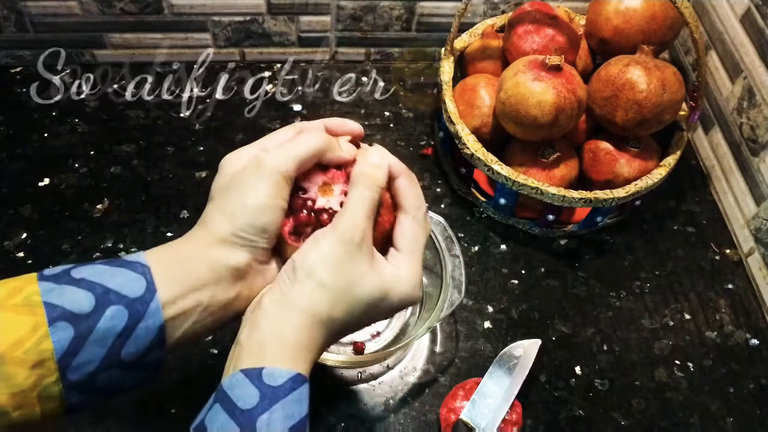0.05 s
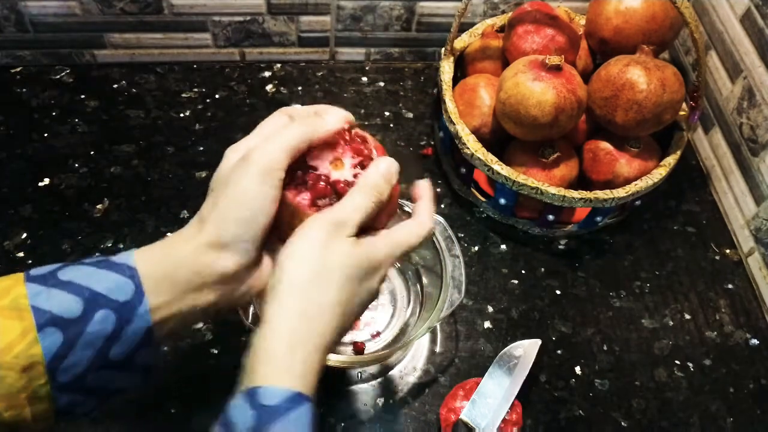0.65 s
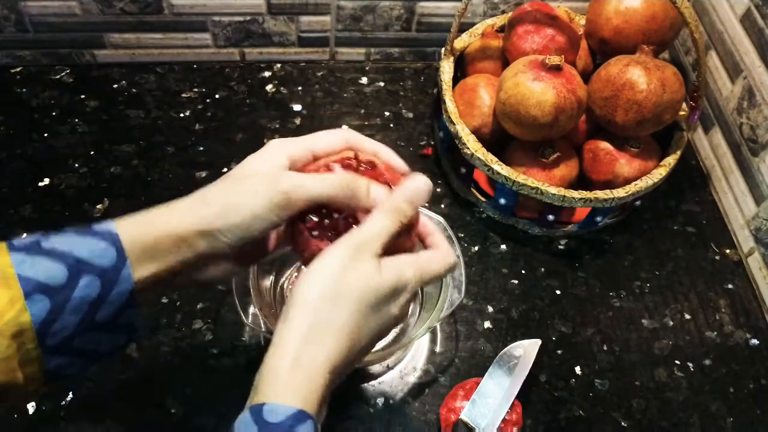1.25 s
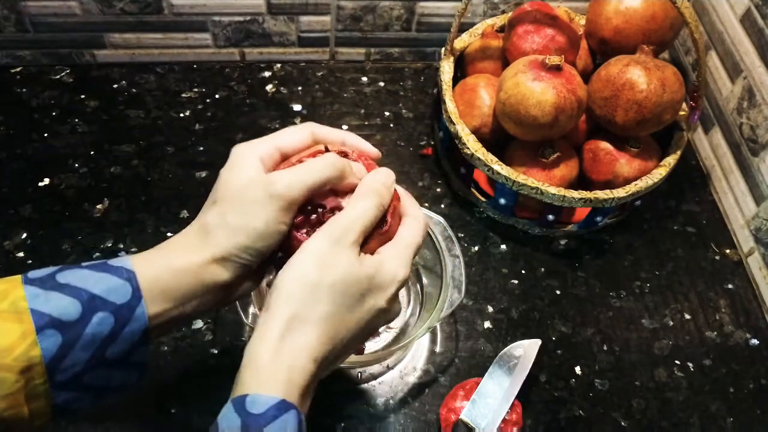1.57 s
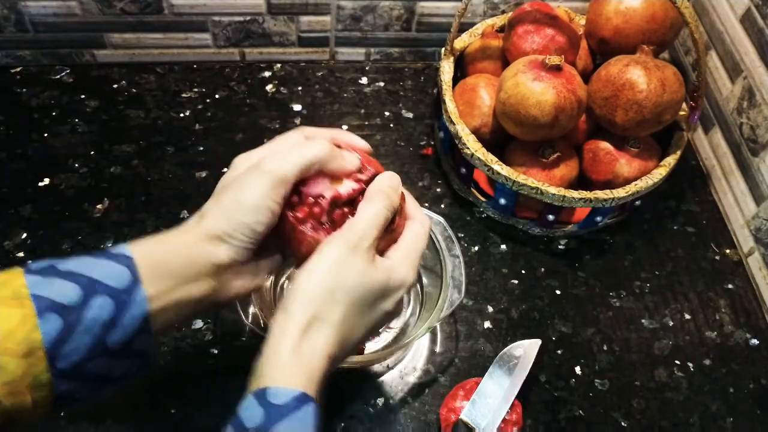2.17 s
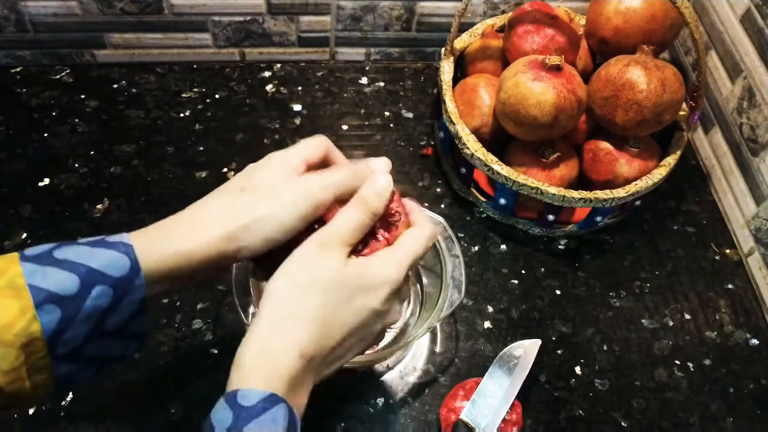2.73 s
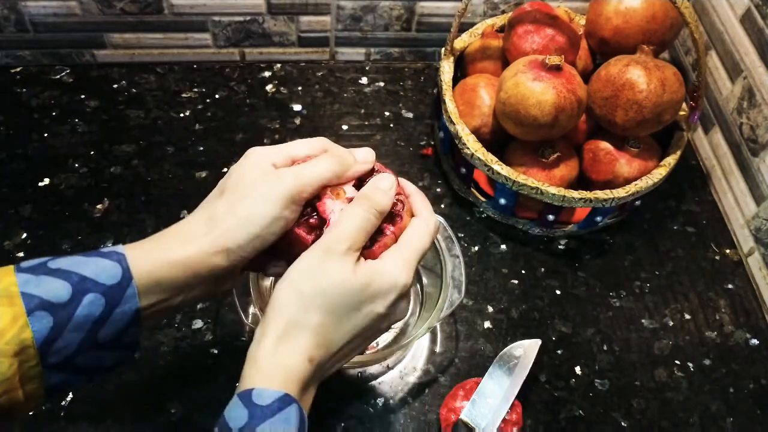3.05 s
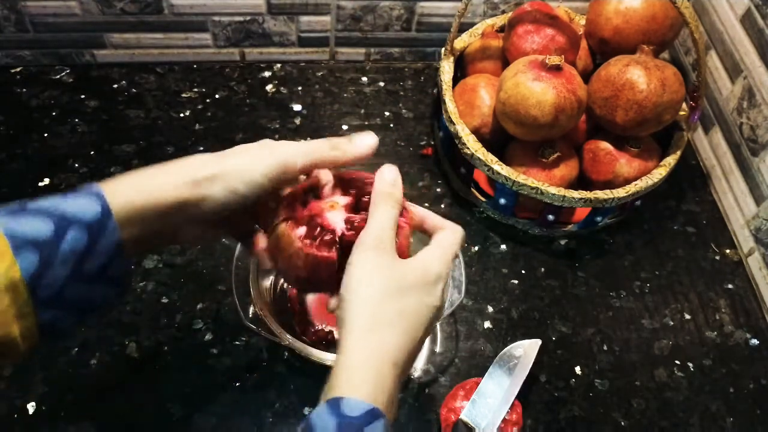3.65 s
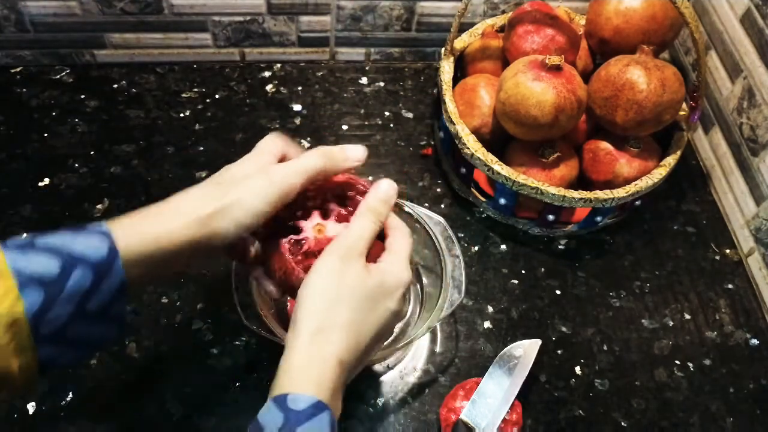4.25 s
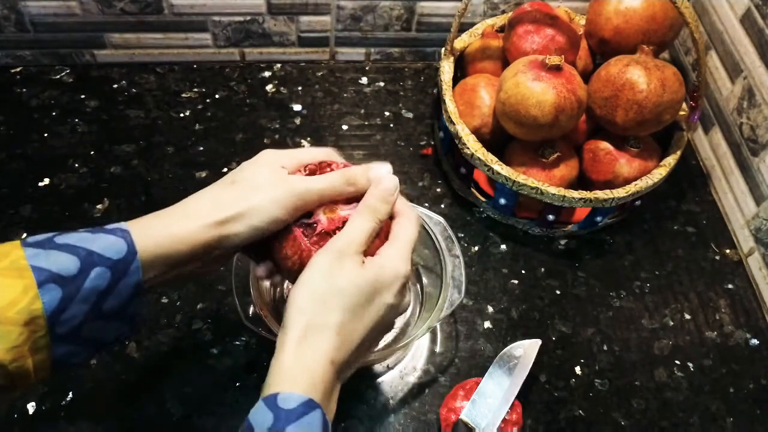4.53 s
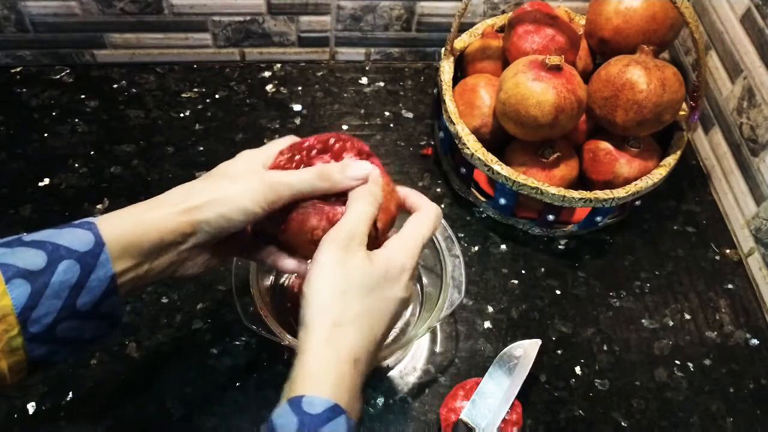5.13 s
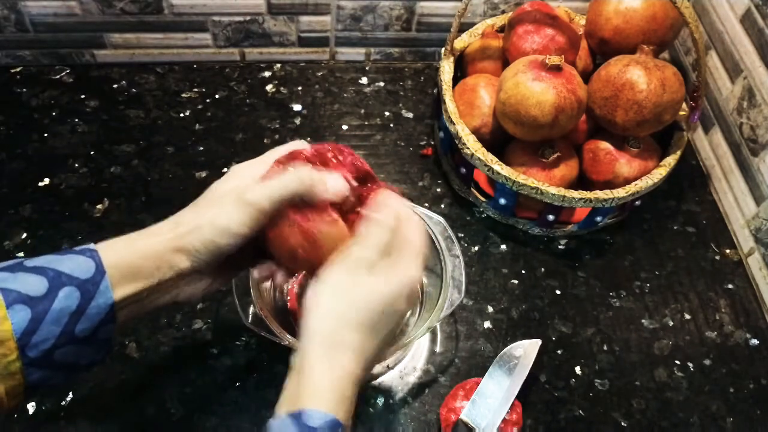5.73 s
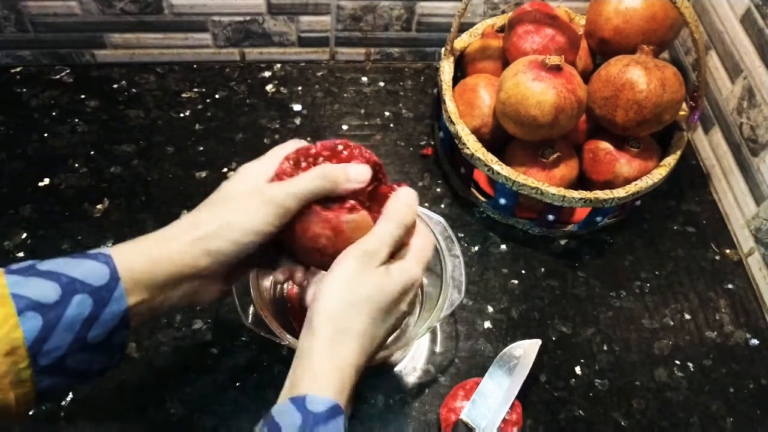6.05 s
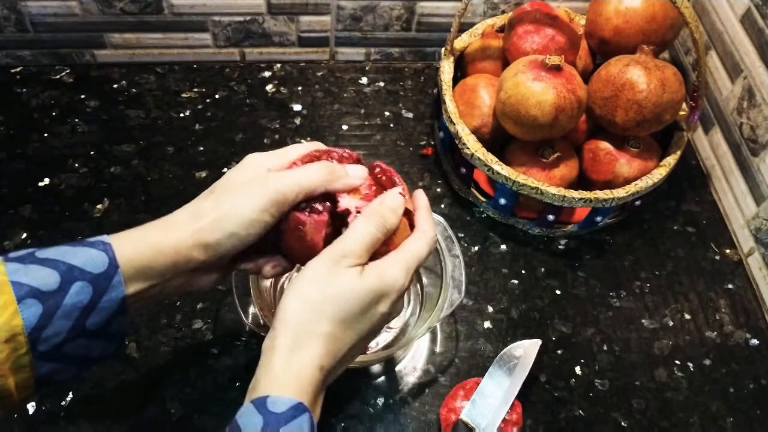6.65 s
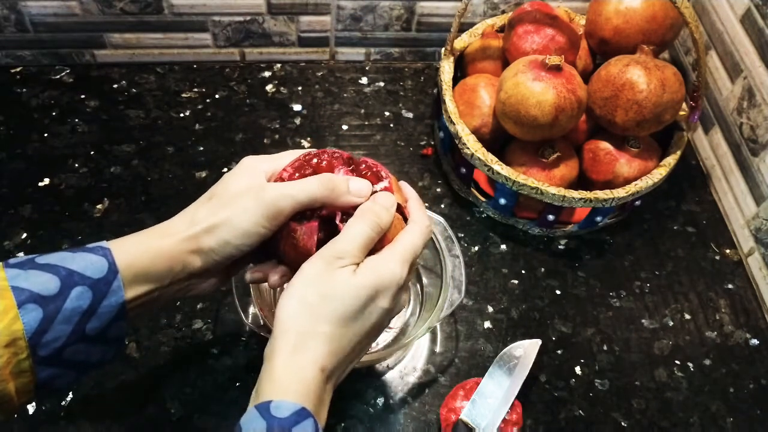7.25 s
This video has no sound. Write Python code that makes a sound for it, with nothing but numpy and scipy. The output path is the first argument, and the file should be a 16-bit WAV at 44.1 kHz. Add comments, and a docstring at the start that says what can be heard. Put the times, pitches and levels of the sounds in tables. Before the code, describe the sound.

A low appliance hum fills a tiled kitchen while a pomegranate is broken open by hand, heard from nearby. The rind gives way in three brief, crisp, slightly hollow bursts of cracking, each with a short room echo. The quieter stretches before and between them hold the soft, sticky crackle of wet pith and an occasional faint tap of a seed landing in a glass bowl.

```python
"""In a tiled kitchen, two hands break a pomegranate open over a glass bowl on a stone counter.
The rind gives way in three loud bouts of snaps: fibres break and the freed pieces ring briefly.
Wet pith crackles as it tears in between, and a few seeds tick against the glass.
Counter and walls throw the sound back, while an appliance hums low in the room."""
import sys
import numpy as np
from scipy import signal
from scipy.fft import rfft, irfft, next_fast_len
from scipy.io import wavfile

SR = 44100
rng = np.random.default_rng(int(sys.argv[2]) if len(sys.argv) > 2 else 0)


def generate_wav(sig):
    """Save sig (samples, or channels by samples) to the path in sys.argv[1] as 16-bit PCM at SR."""
    pcm = np.round(np.clip(np.atleast_2d(sig).T, -1, 1) * 32767).astype(np.int16)
    wavfile.write(sys.argv[1], SR, pcm)


N = 330309
TIME = np.arange(N) / SR
FULL_SNAP_DB = -27.5  # a snap at this level counts as full strength
STEREO_ABOVE_HZ = 4600  # left and right differ only in the treble

# The tone of the room's steady air noise. Each row: frequency in Hz, level in dB.
AIR_TONE = [(25, -23.5), (58, -43), (92, 4.5), (190, 3), (330, 1), (430, -7), (1000, -4.5), (1700, -12.5),
            (2400, -14.5), (3500, -27), (4200, -34.5), (6800, -39), (8200, -57.5), (13000, -39)]
# The drones of the appliance and the room. Each row: pitch in Hz, width in Hz, level in dB.
DRONES = [(110.2, 1.6, -57.5), (109.3, 36, -59.5), (134.7, 20, -62), (211.9, 4.2, -67), (248.3, 4.1, -95.5),
          (301.8, 12.5, -64.5), (341.6, 28.1, -70), (407, 11, -77), (903, 21, -78.5), (1022.4, 14, -74.5),
          (2268, 160, -74), (3028, 64, -83.5), (3685, 150, -87), (7820, 850, -93)]
# How the hum slowly sinks. Each row: time in seconds, gain in dB.
HUM_GAIN = [(0, 4.5), (.5, 2), (4.5, -1.4), (7.4, -1.5)]
# A faint drone that climbs midway. Each row: time in seconds, pitch in Hz, level in dB.
CLIMB_PATH = [(0, 324, -82), (2.8, 301.8, -77), (3.603, 302, -61.5), (4.299, 337, -57.5), (5, 337.5, -61),
              (6.001, 340.3, -76), (7.5, 336, -99)]
# Echoes from the counter and tiles. Each row: delay in seconds, level in dB.
NEAR_ECHOES = [(.0011, -18.5), (.0036, -7.5), (.0068, -13.5), (0.023, -12.5)]
# How long the kitchen rings on. Each row: frequency in Hz, seconds to fade by 60 dB.
ROOM_FADE = [(300, 0.51), (2500, 0.25), (6000, 0.28), (12000, 0.23)]
# The bowl's notes, damped by the fruit in it. Each row: pitch in Hz, level in dB, seconds to fade 60 dB.
BOWL_NOTES = [(1720, -17, 0.015), (2050, -2, 0.028), (2530, -7, 0.012), (2980, -10, 0.039),
              (3550, -22, 0.0096), (7950, 12, 0.028)]
# Seeds landing in the bowl. Each row: start in seconds, level in dB, pitch of the tap in Hz.
SEED_TAPS = [(0.1873, -44, 1790), (1.343, -48.5, 2190), (3.4075, -43.5, 3200), (4.24, -52, 2900),
             (5.023, -44, 2670)]
# Pulls that tear the pith. Each row: middle in seconds, level in dB, half length in seconds.
PULLS = [(.068, -55.5, 0.033), (.35, -71, 0.092), (.57, -74.5, .06), (.857, -68.5, .05),
         (1.215, -67.5, 0.0062), (1.347, -71, 0.021), (1.905, -71, .01), (2.045, -65, 0.042),
         (2.163, -53, .005), (3.195, -71, 0.014), (3.368, -72, 0.015), (3.657, -34, .0098),
         (5.13, -67.5, 0.04), (5.956, -53, 0.0091), (6.557, -74, 0.013), (7.08, -67, 0.019)]
# The tone of wet pith. Each row: frequency in Hz, level in dB.
PITH_TONE = [(300, -7), (1000, -6.5), (2800, 4), (4000, -6), (4900, -3.5), (6800, -5.5), (8400, 2),
             (10500, -7.5), (13000, -7.5)]
# Slow rips in the rind. Each row: middle in seconds, level in dB, half length in seconds.
RIND_RIPS = [(2.333, -36, .0065), (3.588, -44, 0.0047), (3.632, -41, 0.03), (3.668, -44, 0.0038),
             (5.957, -55.5, 0.016)]
# The tone of cracking rind. Each row: frequency in Hz, level in dB.
RIND_TONE = [(40, -13), (130, -20), (300, 1.5), (550, -2), (900, 2.5), (1400, 6.5), (1900, 5.5),
             (3100, 0.5), (3700, -1), (5100, 2), (6800, 3), (8600, 1.5), (10300, -3.5), (13000, -4.5)]
# The notes of the split fruit in cupped hands. Each row: pitch in Hz, width in Hz, level in dB.
HOLLOW_NOTES = [(1760, 18, -9), (1848, 42, 5.5), (2178, 52, 2), (2446, 49, 6), (2660, 100, -8),
                (2730, 160, -6.5), (3020, 235, 6), (3090, 90, -13), (4610, 97, 4.5), (5130, 120, 1.5),
                (8250, 490, -2)]
# Snaps of the rind. Each row: start in seconds, level in dB, pitch of the freed piece in Hz,
# thump gain in dB, treble gain in dB, level change per jump of the crack in dB.
RIND_SNAPS = [(0.075, -49.5, 4500, 5, 1.5, -7), (0.097, -54.5, 4500, 8, 2, -14),
              (.2552, -49, 3060, 3, -2, -12), (.2836, -54.5, 2020, -4, -2, -12),
              (.342, -54.5, 2950, -5, -11, -12), (.379, -54, 2200, -10, -10, -8),
              (0.546, -56.5, 2100, -12, -12, -10), (2.178, -48.5, 3000, -1, -3, -3),
              (2.19, -23.5, 2670, -10, -11, -3), (2.237, -24.5, 2700, -18, -6.5, -13),
              (2.273, -21, 2520, -6.5, -10, -10.5), (2.2902, -30.5, 3050, -23, -12, -4.5),
              (2.3148, -20.5, 2400, -9, -7, -11.5), (2.3415, -34, 2460, -19, 1.5, -13),
              (2.382, -35, 2060, -16, -4.5, -12), (3.451, -51.5, 1780, 7, -8, -11),
              (3.4948, -46, 1830, -6, -0.5, -18), (3.59, -33, 2840, -6.5, -8.5, -1.5),
              (3.614, -32, 1910, -0.5, -9.5, -2.5), (3.6252, -27.5, 1820, -3.5, -14, -7),
              (3.637, -36, 1800, 0, -3, -8), (3.6824, -27.5, 2480, -13, -16, -9.5),
              (5.1305, -45.5, 2270, -11, -3.5, -18), (5.8914, -43, 3240, -19, -1.5, -13),
              (5.954, -42.5, 2500, -11, 2.5, -21), (5.963, -38.5, 3600, -3.5, -11, -19),
              (6.1681, -21, 3650, -13.5, -10, -3), (6.176, -24.5, 2450, -12.5, -10, -5),
              (7.115, -44.5, 3400, -17, -6, -19)]


def undb(db):
    """Turn decibels into a gain to multiply by."""
    return 10 ** (np.asarray(db) / 20)


def unit(x):
    """Scale to an average (rms) level of 1."""
    return x / np.sqrt(np.mean(x ** 2))


def energy_one(x):
    """Scale to a total energy of 1."""
    return x / np.linalg.norm(x)


def on_log_axis(points, hz):
    """Read between rows of (Hz, value) at the given frequencies."""
    row_hz, value = np.transpose(points)
    return np.interp(np.log(np.maximum(hz, 1)), np.log(row_hz), value)


def colour(x, points, size=8192):
    """Give a sound the tone drawn by rows of (Hz, dB)."""
    gains = undb(on_log_axis(points, np.fft.rfftfreq(size, 1 / SR)))
    cepstrum = irfft(np.log(gains))
    # folding onto the first half keeps the filter from ringing before a click
    cepstrum[1:size // 2] *= 2
    cepstrum[size // 2 + 1:] = 0
    response = irfft(np.exp(rfft(cepstrum)))
    return signal.fftconvolve(x, energy_one(response))[:len(x)]


def resonate(x, hz, width):
    """Let a sound ring in a band around one pitch."""
    return signal.lfilter(*signal.iirpeak(hz, hz / width, fs=SR), x)


def cut(x, hz, kind, order=2):
    """Keep only the "low" or the "high" side of a frequency."""
    return signal.sosfilt(signal.butter(order, hz, kind, fs=SR, output="sos"), x)


def add(track, s, sound):
    """Mix a short sound in at s seconds."""
    start = max(int(s * SR), 0)
    track[start:start + len(sound)] += sound[:N - start]


def swells(table):
    """A loudness curve with a bell shape for each row of (middle, level, half length)."""
    out = np.zeros(N)
    for s, db, half in table:
        near = slice(*np.searchsorted(TIME, [s - 4 * half, s + 4 * half]))
        out[near] += undb(db) * np.exp(-((TIME[near] - s) / half) ** 2)
    return out


def after_snaps(release_s):
    """A curve that jumps at each snap, by 1 for a full-strength one, and dies away."""
    kicks = np.zeros(N)
    for s, db, *_ in RIND_SNAPS:
        add(kicks, s, undb([db - FULL_SNAP_DB]))
    return signal.lfilter([1], [1, -np.exp(-1 / (release_s * SR))], kicks)


def drones():
    """Noise gathered in narrow bands, so that each drone wavers by itself."""
    size = next_fast_len(N)
    hz = np.fft.rfftfreq(size, 1 / SR)
    power = 0
    for centre, width, db in DRONES:
        band = unit(1 / (1 + (1.8 * (hz - centre) / width) ** 2))
        power += (undb(db) * band) ** 2
    return irfft(rfft(rng.standard_normal(size)) * np.sqrt(power), size)[:N]


def climbing_drone():
    """A faint, wavering tone that climbs while it is loudest."""
    s, hz, db = np.transpose(CLIMB_PATH)
    waver = unit(1.33 + unit(cut(rng.standard_normal(N), 13, "low")))
    phase = 2 * np.pi * np.cumsum(np.interp(TIME, s, hz)) / SR
    return undb(np.interp(TIME, s, db)) * waver * np.sin(phase)


def appliance(swell_db=-10):
    """Over a soft rush of air, the hum sinks slowly and swells briefly after strong snaps."""
    air = undb(-58.5) * unit(colour(rng.standard_normal(N), AIR_TONE))
    sinking = undb(np.interp(TIME, *np.transpose(HUM_GAIN)))
    swelling = 1 + undb(swell_db) * after_snaps(release_s=0.087)
    hum = cut(drones(), 81.5, "high", order=4) * sinking * swelling
    climb = climbing_drone()
    hiss = undb(-84.5) * cut(rng.standard_normal(N), STEREO_ABOVE_HZ, "high", order=8)
    return air + hum + climb + np.array([hiss, -hiss])


def room_tail(rise_s=0.0034):
    """Countless echoes blur into a tail of noise whose treble dies first."""
    hz, t, spectrum = signal.stft(rng.standard_normal(SR // 2), SR, nperseg=256)
    fade = undb(-60 * t / on_log_axis(ROOM_FADE, hz)[:, None])
    tail = signal.istft(spectrum * fade, SR)[1]
    rise = 1 - np.exp(-TIME[:len(tail)] / rise_s)
    return energy_one(tail * rise)


def late_echoes(direct, count=3):
    """The fruit moves in the hands, so the blend of late echoes keeps changing."""
    weights = np.array([unit(cut(rng.standard_normal(N), 14.1, "low")) for _ in range(count)])
    weights /= np.linalg.norm(weights, axis=0)
    return sum(signal.fftconvolve(direct * weight, room_tail())[:N] for weight in weights)


def kitchen(direct, room_db=-8.5, side_db=-10, scatter_s=0.029):
    """Near surfaces echo and the room rings on; scattered treble sets left and right apart."""
    mid = direct + undb(room_db) * late_echoes(direct)
    for delay, db in NEAR_ECHOES:
        add(mid, delay, undb(db) * direct)
    t = TIME[:SR // 8]
    scatter = energy_one(rng.standard_normal(len(t)) * np.exp(-t / scatter_s))
    scattered = signal.fftconvolve(direct, scatter)[:N]
    side = undb(side_db) * cut(scattered, STEREO_ABOVE_HZ, "high", order=20)
    return np.array([mid + side, mid - side])


def seeds(width_hz=1200, contact_s=0.0025):
    """Each soft seed taps the glass and wakes the bowl's notes near the pitch of its tap."""
    out, t = np.zeros(N), TIME[:SR // 10]
    ring = sum(undb(db - 60 * t / fade_s) * np.sin(2 * np.pi * hz * t) for hz, db, fade_s in BOWL_NOTES)
    for s, db, tap_hz in SEED_TAPS:
        contact = rng.standard_normal(len(t)) * np.exp(-t / contact_s)
        glass = resonate(ring + 2.3 * contact, tap_hz, width_hz)
        tap = resonate(glass, tap_hz, width_hz) + 0.15 * contact
        add(out, s, undb(db) * tap / np.abs(tap).max())
    return out


def fibres(size, per_s, spread_db):
    """Fibres break at random moments: many small clicks, a few large."""
    breaks = rng.random(size) < per_s / SR
    signs = rng.choice([-1, 1], size)
    strengths = undb(spread_db * np.minimum(rng.exponential(size=size), 4))
    return unit(breaks * signs * strengths)


def pith(squishes_per_s=6, squish_half_s=0.0033):
    """Wet pith peels apart with a fine crackle: at each pull, behind each snap, under the fingertips."""
    # fingertips squeeze the wet seeds at random moments
    chance = rng.random((int(squishes_per_s * TIME[-1]), 2))
    squishes = [(when * TIME[-1], -73 + 20 * np.log10(size), squish_half_s) for when, size in chance]
    peeling = undb(-48.5) * after_snaps(release_s=0.012)
    loudness = undb(-82) + swells(PULLS) + peeling + swells(squishes)
    crackle = fibres(N, per_s=3300, spread_db=3)
    sticky_seeds = undb(-3) * fibres(N, per_s=90, spread_db=2.5)  # they let go one by one
    return undb(-3.5) * colour(loudness * (crackle + sticky_seeds), PITH_TONE)


def snap(db, thump_db, treble_db, hz, front_s=0.0024, fibre_fade_s=0.0021):
    """A crack runs through the rind, fibres break behind it, and the freed piece rings briefly."""
    t = TIME[:2048]
    front = energy_one(rng.choice([-1, 1], len(t)) * np.exp(-(t / front_s) ** 2))
    force = energy_one(fibres(len(t), per_s=9000, spread_db=5) * np.exp(-t / fibre_fade_s))
    bite = front + force
    # fine fibres sound high in every snap; coarse ones sound lower and break only in strong snaps
    fine = undb(-1) * resonate(bite, hz=8150, width=1400)
    coarse = undb(1 + db - FULL_SNAP_DB) * resonate(bite, hz=5200, width=1400)
    treble = undb(treble_db) * energy_one(cut(bite + fine + coarse, 4200, "high", order=4))
    # the sudden release kicks the piece; deep cracks move the whole fruit
    force[0] += 1
    ring = energy_one(cut(resonate(force, hz, width=900), 980, "high"))
    thump = undb(thump_db) * energy_one(cut(force, 890, "low", order=4))
    return undb(db) * (ring + thump + 2 * treble)


def cracks(jumps=3, gap_s=0.0045, jitter_s=0.0005, pitch_spread=0.06, brighten_db=3):
    """Each crack runs on in a few quick jumps, each shallower and brighter than the last."""
    force = np.zeros(N)
    for s, db, hz, thump_db, treble_db, fade_db in RIND_SNAPS:
        for jump in range(jumps):
            add(force, s, snap(db + jump * fade_db, thump_db, treble_db + jump * brighten_db, hz))
            s += gap_s + jitter_s * rng.standard_normal()
            hz *= np.exp(pitch_spread * rng.standard_normal())
    return force


def rind(snap_db=12, rip_db=-7, creak_db=-14):
    """Snaps, slower rips and the creaks of each pull ring the hollow between fruit and hands."""
    ripping = unit(cut(fibres(N, per_s=3600, spread_db=1.5), 4000, "low"))
    ripping = unit(ripping + 1.9 * resonate(ripping, hz=3000, width=1200))
    rips = undb(rip_db) * swells(RIND_RIPS) * ripping
    creaking = unit(cut(fibres(N, per_s=130, spread_db=5), 3000, "low"))
    creaks = undb(creak_db) * swells(PULLS) * creaking
    breaking = colour(undb(snap_db) * cracks() + rips + creaks, RIND_TONE)
    hollow = sum(undb(db) * resonate(breaking, hz, width) for hz, width, db in HOLLOW_NOTES)
    return breaking + hollow


def scene():
    """The fruit and the bowl in the humming kitchen."""
    return kitchen(rind() + pith() + seeds()) + appliance()


def record(dry, ceiling_db=-14, top_hz=13150):
    """Round off the sharpest peaks that left and right share, then cut the highest treble."""
    mid = dry.mean(axis=0)
    rounded = dry - mid + undb(ceiling_db) * np.tanh(mid / undb(ceiling_db))
    return signal.sosfilt(signal.ellip(10, .2, 70, top_hz, fs=SR, output="sos"), rounded)


dry = scene()
out = record(dry)
generate_wav(out)
```